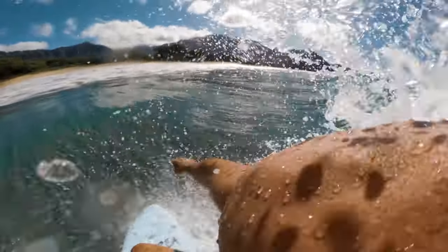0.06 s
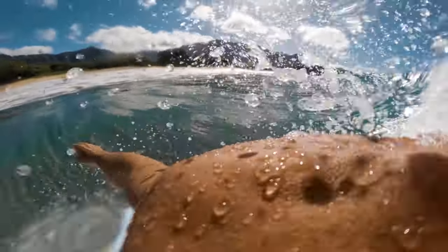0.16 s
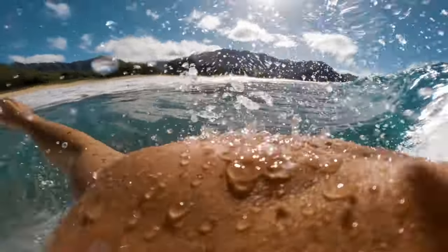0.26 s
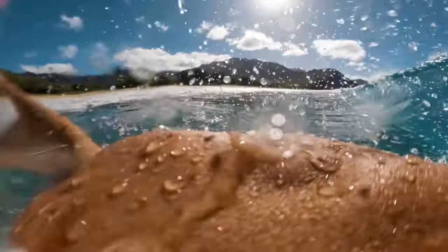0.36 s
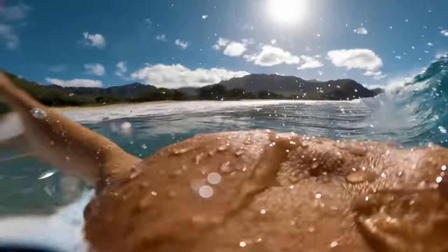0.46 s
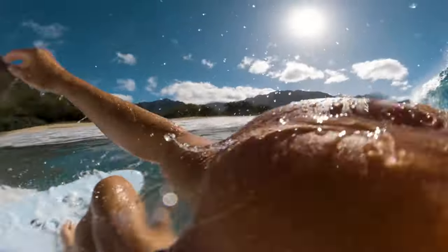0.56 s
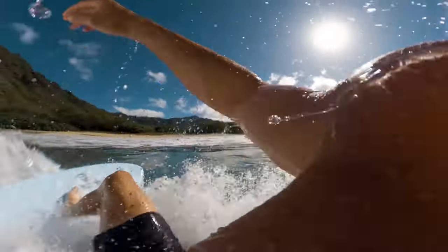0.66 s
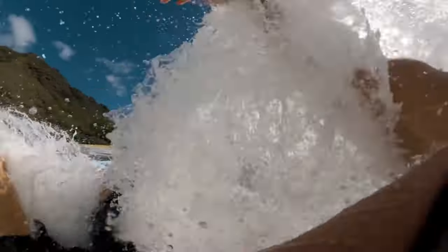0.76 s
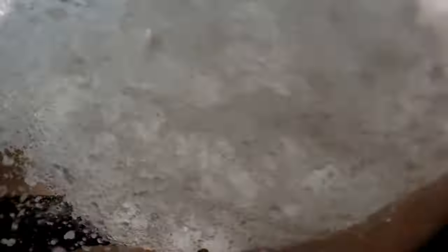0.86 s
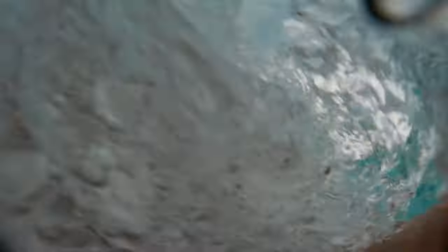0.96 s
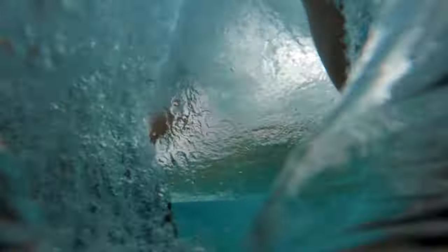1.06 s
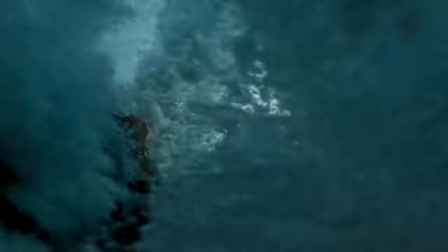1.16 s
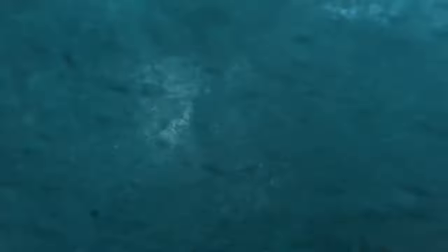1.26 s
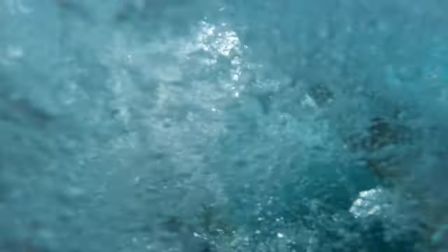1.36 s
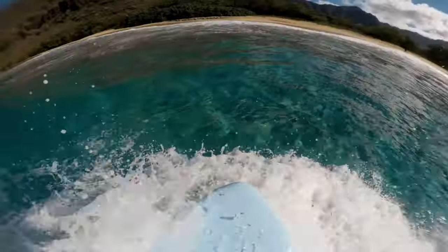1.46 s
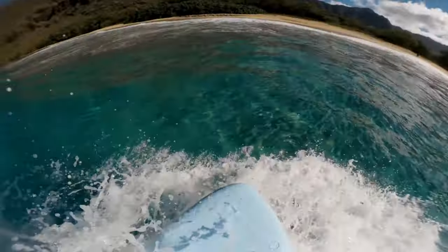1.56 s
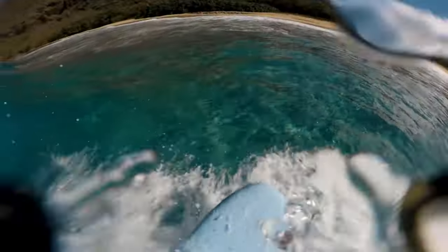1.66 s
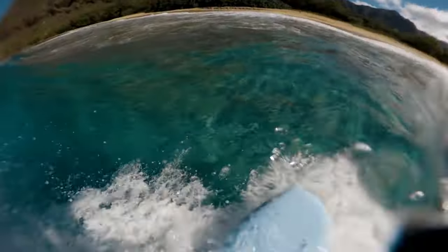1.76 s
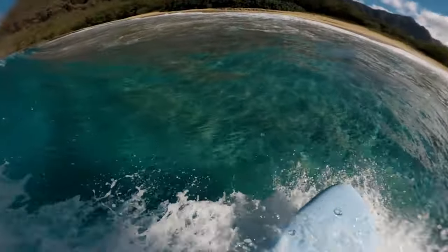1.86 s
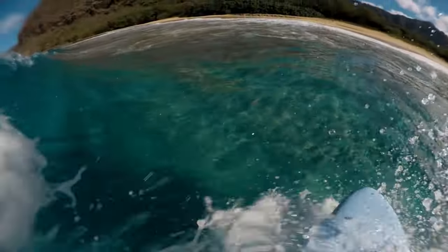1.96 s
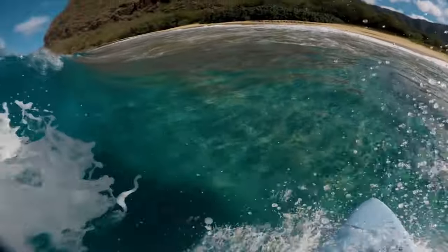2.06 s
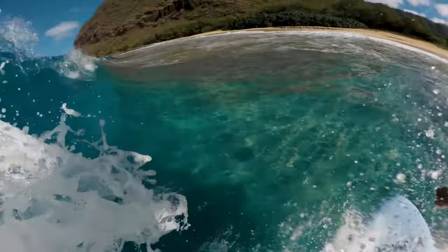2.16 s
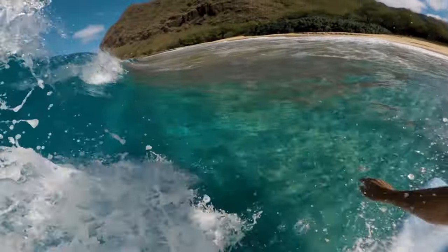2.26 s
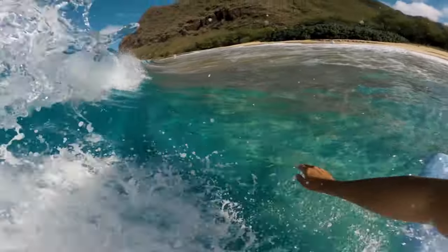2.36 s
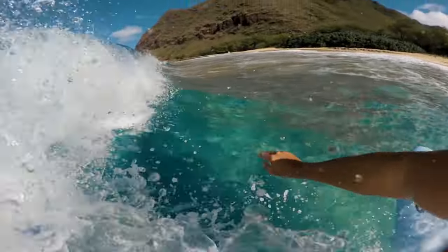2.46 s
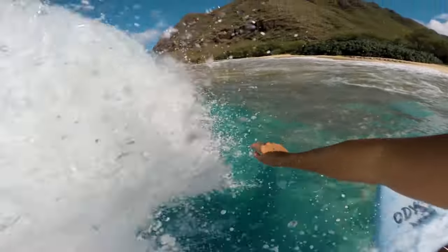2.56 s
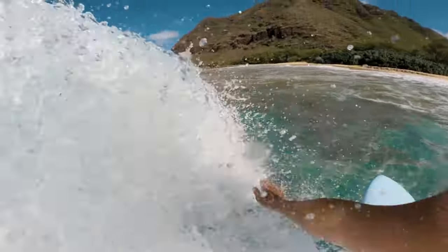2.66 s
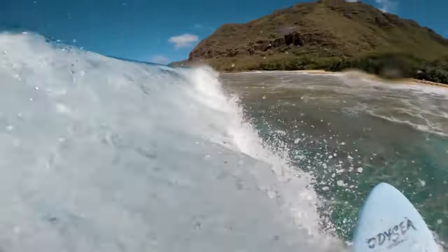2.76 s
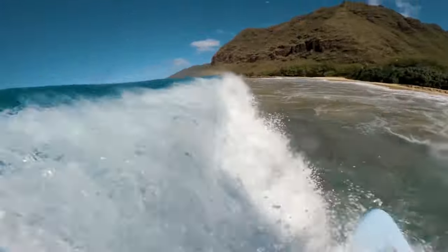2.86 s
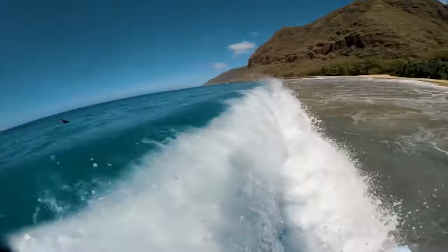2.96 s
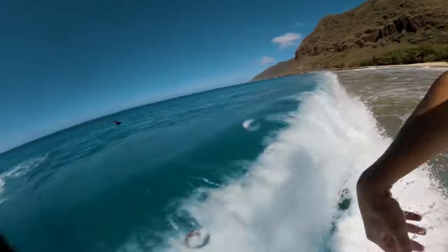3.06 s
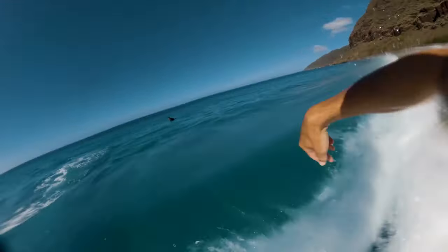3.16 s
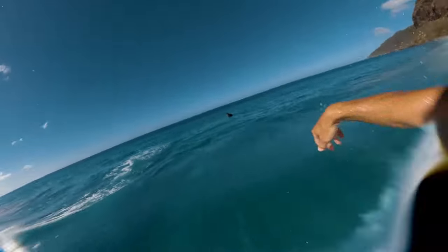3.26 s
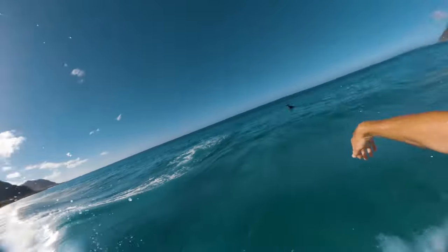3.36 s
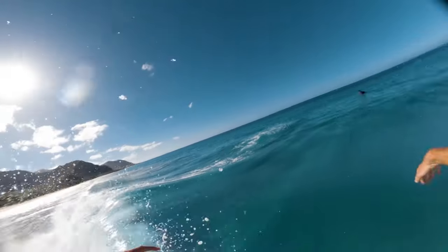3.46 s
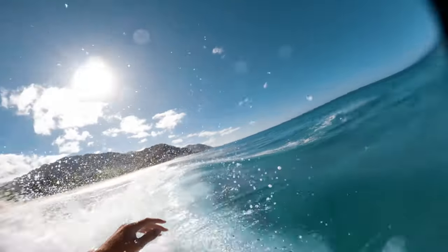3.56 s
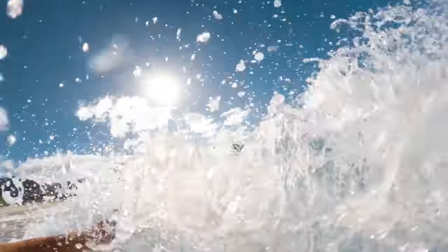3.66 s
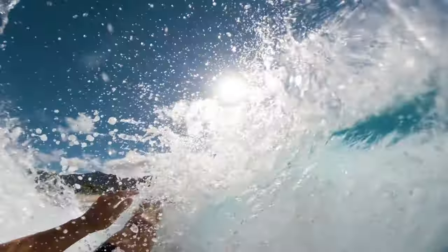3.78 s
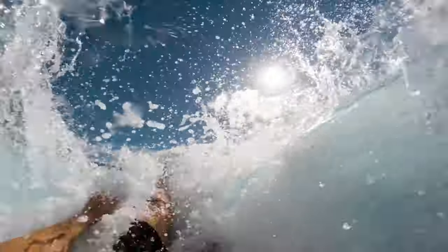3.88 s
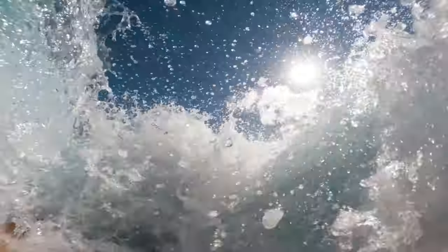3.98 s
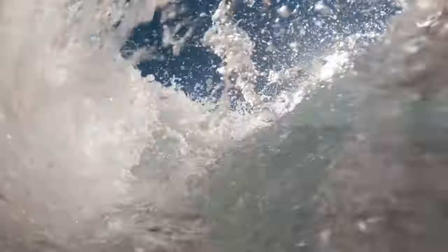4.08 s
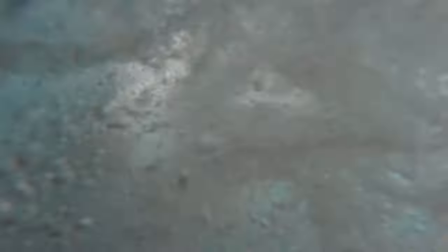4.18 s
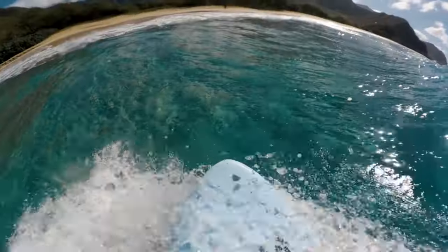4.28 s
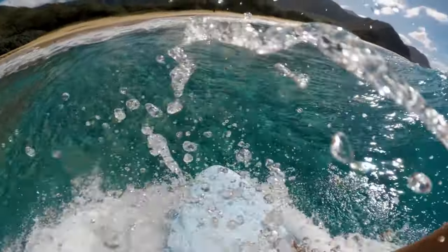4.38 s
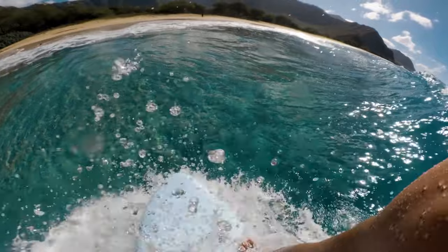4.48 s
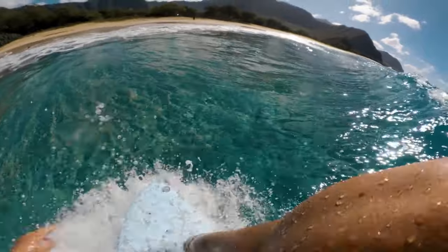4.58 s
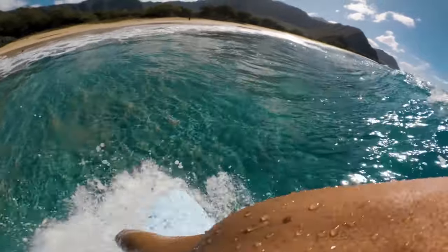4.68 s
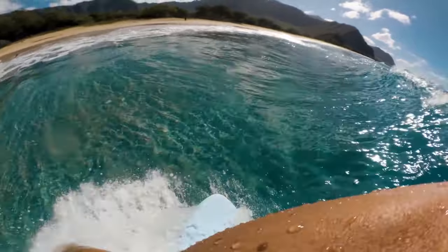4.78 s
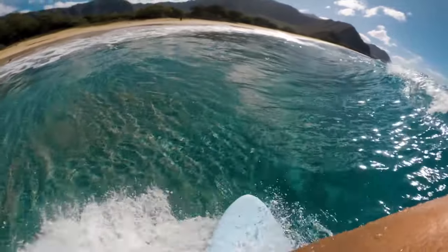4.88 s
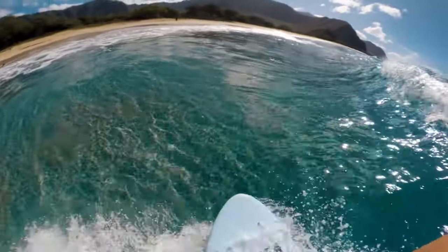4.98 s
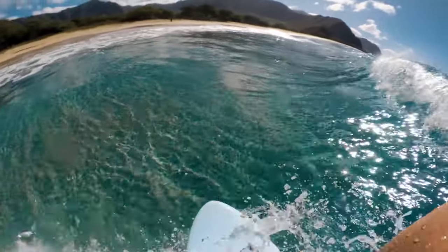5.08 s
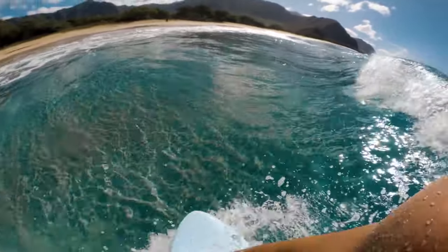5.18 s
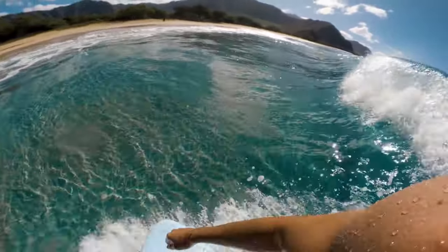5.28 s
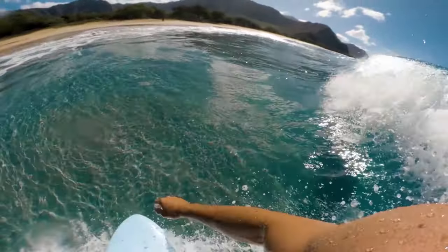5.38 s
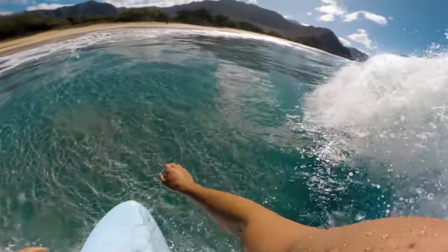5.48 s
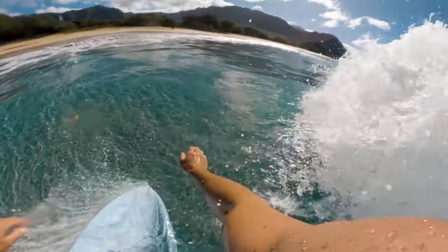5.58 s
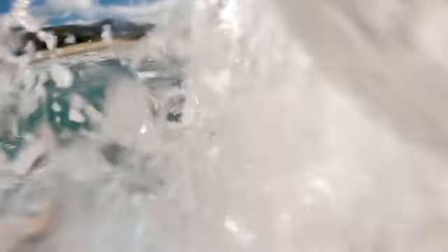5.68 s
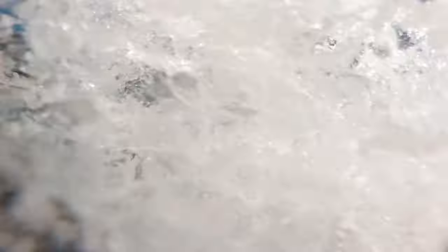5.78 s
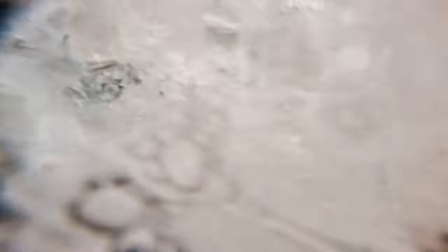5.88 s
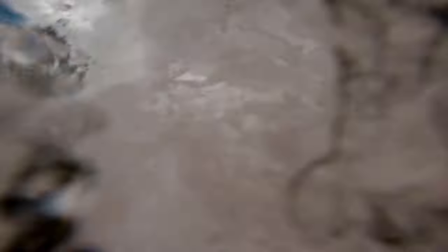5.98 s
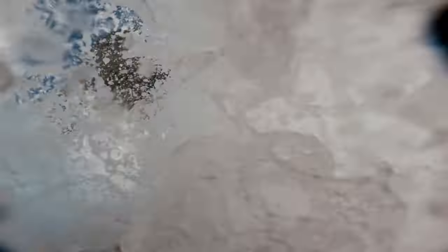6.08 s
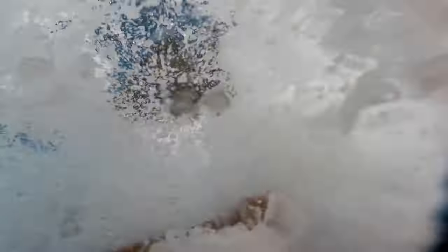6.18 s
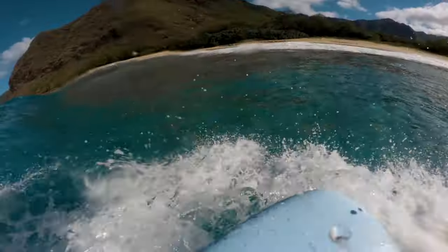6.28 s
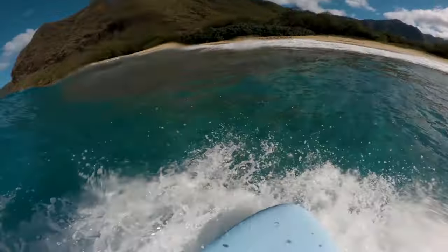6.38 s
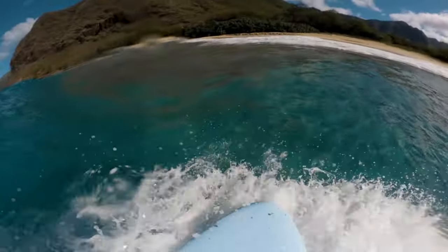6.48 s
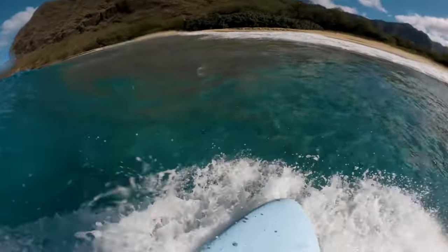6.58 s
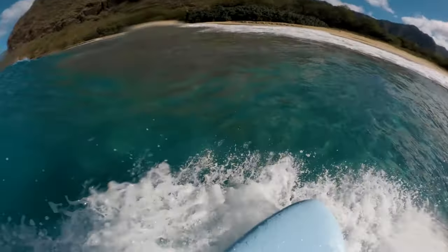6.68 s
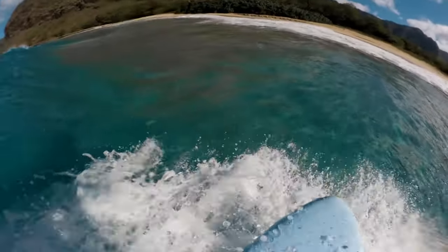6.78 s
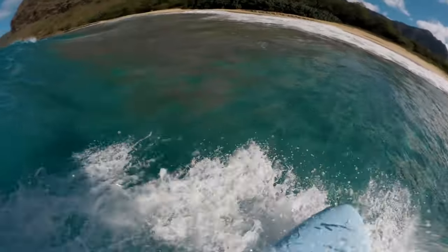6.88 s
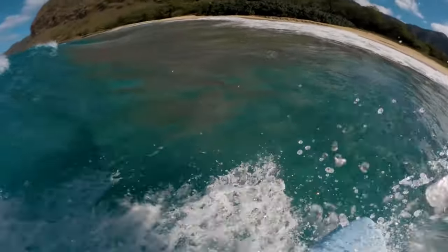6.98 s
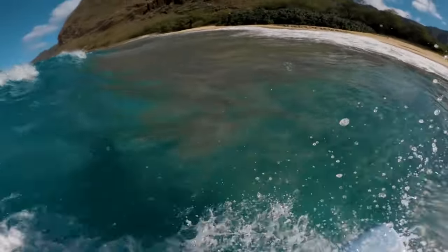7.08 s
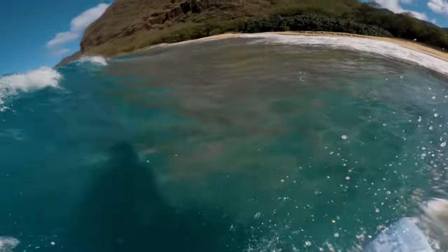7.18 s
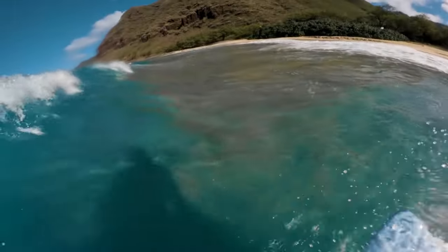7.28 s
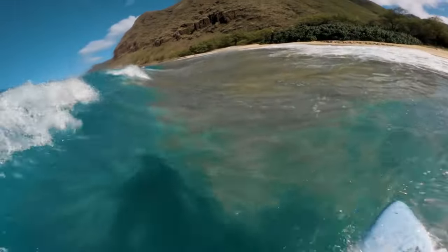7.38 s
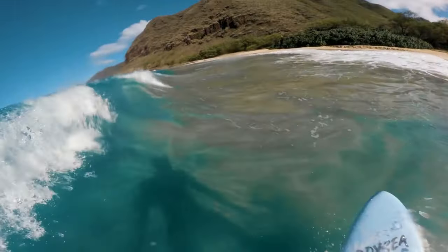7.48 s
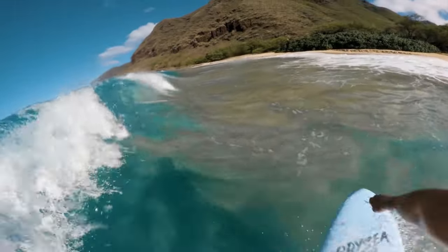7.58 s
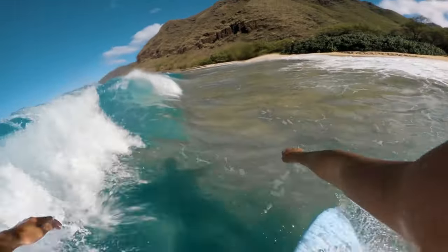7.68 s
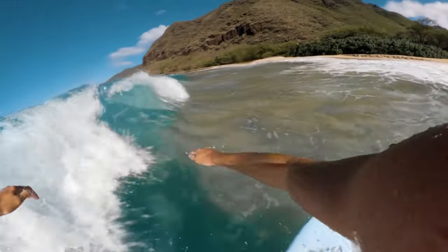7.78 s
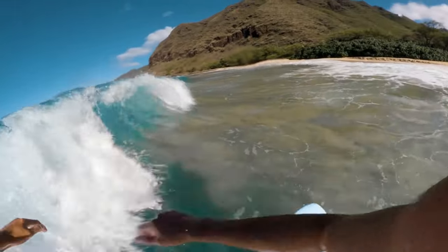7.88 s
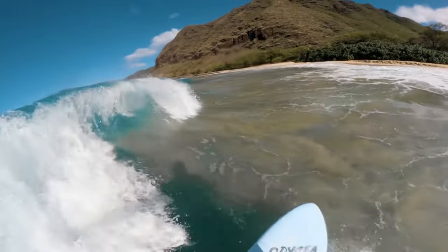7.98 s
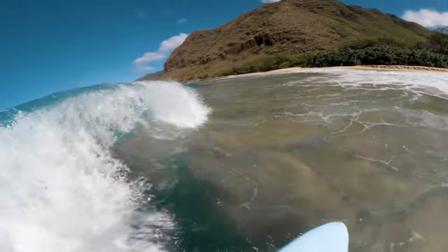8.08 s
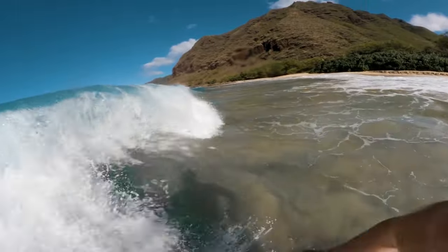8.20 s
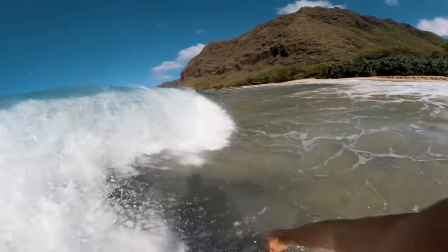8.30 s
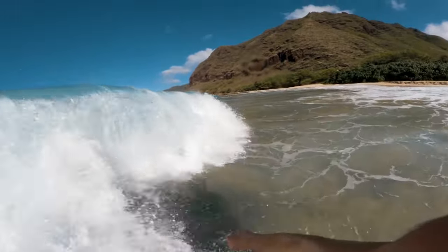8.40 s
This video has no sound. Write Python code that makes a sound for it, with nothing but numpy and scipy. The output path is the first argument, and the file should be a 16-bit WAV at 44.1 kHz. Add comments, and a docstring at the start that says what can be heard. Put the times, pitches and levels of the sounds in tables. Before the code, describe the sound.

A surfer rides a breaking sea wave, with deep churning, bubbling froth and low wind rumble right at the microphone. Water slaps and sputters against the camera housing early on. Later come glugs and a splash, followed by a wavering, watery whistle with wind thumps. Foam then hits the housing again in a loud cluster of muffled slaps, and fine spray hisses over the churning water toward the end.

```python
"""Whitewater churns round a surfboard, heard from the rider's small camera; wind buffets the microphone.
Entrained air rings as bubbles, air pockets glug, drops shower down. Twice foam swamps the camera,
sputtering and slapping on the housing. After one splash a water film covers the port and rings in
gliding resonances as the air stream pulls at it. Near the end spray hisses across the port."""
import sys
import numpy as np
from scipy import signal
from scipy.fft import rfft, irfft, next_fast_len
from scipy.io import wavfile
from scipy.ndimage import map_coordinates

SR = 44100
rng = np.random.default_rng(int(sys.argv[2]) if len(sys.argv) > 2 else 0)


def to_wav(s):
    """Save 16-bit WAV."""
    ch = np.atleast_2d(s).T  # columns
    pcm = np.round(np.clip(ch, -1, 1) * 32767)  # PCM
    wavfile.write(sys.argv[1], SR, pcm.astype(np.int16))


N = 372204

# water film resonances: (ratio to lowest [-], relative width [-], level [dB])
FILM_MODES = [(1, .06, 1), (1.51, .055, 1.5), (2.3, .06, 3), (3.05, .08, -4)]
# wet port transmission: (frequency [Hz], gain [dB])
WET_PORT = [(600, -74), (1100, -4), (1600, -1.5), (2300, -6), (3100, 0), (4300, -2.5), (5800, -7.5),
            (7000, -18.5), (9000, -27), (10300, -28), (13000, -39), (15500, -58)]


def amp(db):
    """Decibels to gain."""
    return 10 ** (np.asarray(db) / 20)


def unit(x):
    """x at rms 1."""
    return x / np.sqrt(np.mean(x ** 2) + 1e-20)


def along(points, hz):
    """Interpolate (Hz, value) points on a log axis."""
    f, v = np.transpose(points)
    return np.interp(np.log(hz + 1), np.log(f + 1), v)


def curve(rows):
    """Interpolate (s, value) rows per sample."""
    return np.interp(np.arange(N) / SR, *np.transpose(rows))


def ramp(start_s, end_s, first, last):
    """Linear from first to last, held outside."""
    return curve([(start_s, first), (end_s, last)])


def gate(start_s, end_s, rise_s, fall_s):
    """Gain that opens from start_s and closes from end_s."""
    t = np.arange(N) / SR
    return np.clip((t - start_s) / rise_s, 0, 1) * np.clip(1 - (t - end_s) / fall_s, 0, 1)


def wobble(rate_hz):
    """Smooth random curve, rate_hz knots a second."""
    knots = rng.standard_normal(int(N * rate_hz / SR) + 4)
    return map_coordinates(knots, [np.arange(N) * rate_hz / SR])


def filtered(x, response):
    """Apply a gain given as a function of Hz."""
    m = next_fast_len(N + SR // 2)
    return irfft(rfft(x, m) * response(np.fft.rfftfreq(m, 1 / SR)), m)[:N]


def shaped(x, spectrum):
    """Filter by (Hz, dB) points."""
    return filtered(x, lambda hz: amp(along(spectrum, hz)))


def rush(spectrum, lump_db, lump_hz):
    """Turbulent noise in short random lumps; rms 1."""
    eddies = rng.standard_normal(N) * amp(lump_db * wobble(lump_hz))
    return unit(shaped(eddies, spectrum))


def narrow_note(hz, width_hz):
    """Resonance rung by turbulence: a wavering note that follows hz; rms 1."""
    phase = 2 * np.pi * np.cumsum(hz) / SR
    return unit(wobble(width_hz) * np.cos(phase) + wobble(width_hz) * np.sin(phase))


def surges():
    """Water masses roll over the camera: gains of roar, wash and thud."""
    # (start [s], end [s], roar [dB], wash [dB], thud [dB])
    masses = [(0.806, 0.895, -20.5, -20, -20.5), (0.905, 1.097, -22, -23.5, -21.5),
              (1.095, 1.178, -18.5, -20, -19.5), (1.179, 1.247, -16, -24.5, -17.5),
              (1.259, 1.292, -13, -16.5, -16.5), (1.365, 1.469, -17.5, -36, -20.5),
              (1.504, 1.565, -39, -47, -36), (1.915, 1.965, -36, -40, -23), (1.985, 2.085, -50, -42, -29),
              (3.687, 3.763, -25, -27, -25), (4.001, 4.173, -21, -26, -30), (4.154, 4.298, -15.5, -19, -18),
              (5.776, 5.824, -23, -41, -21.5), (5.855, 5.89, -21.5, -40, -20.5),
              (5.9, 5.984, -17, -24.5, -16.5), (5.989, 6.17, -19.5, -24, -20.5),
              (6.974, 7.056, -23.5, -39, -27.5)]
    return sum(amp(levels_db)[:, None] * gate(start_s, end_s, .02, .004)
               for start_s, end_s, *levels_db in masses)


def wind(thud):
    """Air stream buffets the microphone; surges add thuds in the same band."""
    # air stream: (time [s], level [dB])
    levels = [(1.15, -26.5), (1.255, -34), (1.31, -26), (1.45, -27.5), (1.75, -43.5), (2.05, -35.5),
              (2.27, -41.5), (2.5, -29.5), (3.2, -21), (4.05, -26), (4.65, -43.5), (5.05, -24.5),
              (5.4, -34.5), (5.75, -19), (6.3, -26), (6.5, -29), (7.2, -38.5), (7.85, -24), (8.44, -22.5)]
    # buffeting: (frequency [Hz], density [dB])
    spectrum = [(10, -33.5), (18, -11), (28, 2.5), (45, -1), (90, -3), (130, -4), (170, -7.5), (240, -45),
                (500, -100)]
    return np.hypot(amp(curve(levels)), thud) * amp(2) * rush(spectrum, lump_db=1.9, lump_hz=25)


def churn(flow_db, roar):
    """Deep turbulence under the board."""
    # (frequency [Hz], density [dB])
    spectrum = [(50, -44.5), (110, -16), (145, -1), (240, 0.5), (400, -3), (520, -10), (800, -46),
                (1500, -100)]
    gain = np.hypot(amp(flow_db + .8 * wobble(11)), roar) * amp(-.4)
    return gain * rush(spectrum, lump_db=2, lump_hz=90)


def bubbles(centre_hz, spread, decay_cycles, size_db, count):
    """Bubble cloud, each a damped note rising in pitch; rms 1."""
    when, pitch, size = rng.random(count), rng.standard_normal(count), rng.exponential(size=count)
    hz = centre_hz * np.exp(spread * np.clip(pitch, -2, 2))[:, None]
    cycles = hz * np.arange(SR // 40) / SR
    age = cycles / decay_cycles
    notes = np.sin(2 * np.pi * cycles * (1 + age / 20)) * np.exp(-age) * (1 - np.exp(-cycles))
    notes *= amp(size_db * np.minimum(size, 4))[:, None]
    index = (when * N).astype(int)[:, None] + np.arange(SR // 40)
    return unit(np.bincount(index.ravel(), notes.ravel(), N)[:N])


def wash(excess_flow_db, splash):
    """Froth in which entrained air rings as thousands of bubbles."""
    # (frequency [Hz], density [dB])
    spectrum = [(200, -31.5), (380, -9), (500, -2.5), (700, -2), (840, -5), (980, -11.5), (1300, -47),
                (2500, -100)]
    cloud = bubbles(centre_hz=650, spread=.3, decay_cycles=4.5, size_db=2.2, count=3600)
    cloud = unit(shaped(cloud, spectrum))
    froth = rush(spectrum, lump_db=1.2, lump_hz=110)
    return np.hypot(amp(-24 + .55 * excess_flow_db), splash) * unit(froth + amp(-1.5) * cloud)


def foam(excess_flow_db, splash):
    """Foam rushes on top of the wash, growing with flow and surges."""
    # at mid flow: (time [s], level [dB])
    levels = [(1.12, -31), (1.25, -37), (1.32, -27), (1.44, -38), (1.55, -35), (2.2, -36.5), (2.36, -26.5),
              (3.2, -34), (3.7, -29), (4.15, -31.5), (4.7, -34.5), (5.6, -48), (6.0, -38), (6.9, -36.5),
              (7.25, -46.5), (8.44, -44)]
    # (frequency [Hz], density [dB])
    spectrum = [(500, -48.5), (800, 0), (1000, 0.5), (1300, -8), (1650, -16), (2200, -26), (3200, -39.5),
                (4200, -47), (6500, -61.5), (9000, -85.5), (12000, -115)]
    level_db = curve(levels) + .28 * excess_flow_db + 2.1 * wobble(12)
    gain = np.hypot(amp(level_db), amp(-16) * splash) * amp(3.5)
    return gain * rush(spectrum, lump_db=2, lump_hz=130)


def whitewater():
    """Wind plus the churn, wash and foam that the flow drives."""
    # flow round the board: (time [s], level [dB])
    flow = [(1.15, -23.5), (1.255, -34.5), (1.31, -23.5), (1.42, -24.5), (1.51, -40), (1.62, -35),
            (1.8, -28), (2.17, -31), (2.33, -27), (2.48, -19), (2.9, -20), (3.22, -19), (3.38, -25),
            (3.85, -22.5), (4.38, -23.5), (4.56, -25), (5.3, -26.5), (5.65, -24.5), (5.84, -31),
            (5.97, -25), (6.22, -27), (6.4, -20), (7.02, -22), (7.32, -24.5), (8.15, -18.5), (8.44, -20)]
    flow_db, mid_flow_db = curve(flow), -22
    excess_db = flow_db - mid_flow_db
    roar, splash, thud = surges()
    return wind(thud) + churn(flow_db, roar) + wash(excess_db, splash) + foam(excess_db, splash)


def edged(roar):
    """At times the roar is full up to a sharp edge and dark just above it."""
    # (start [s], end [s], edge [Hz], lift below [dB], cut above [dB])
    edges = [(0.78, 1.08, 746, 2, -5), (4.45, 4.935, 940, 2.5, -4), (4.97, 5.734, 892, 5.5, -4),
             (7.35, 8.44, 790, 0, -2.5)]
    out = roar.copy()
    for start_s, end_s, hz, lift_db, cut_db in edges:
        shape = [(.75 * hz, 0), (.98 * hz, lift_db), (1.05 * hz, cut_db),
                 (1.6 * hz, cut_db), (3 * hz, 0)]
        out += gate(start_s, end_s, .034, .034) * (shaped(roar, shape) - roar)
    return out


def glugs():
    """Big air pockets glug on the housing: short, wavering, slightly rising notes."""
    # (time [s], pitch [Hz], peak [dB], length [s])
    pockets = [(0.845, 482, -17, .022), (0.868, 510, -14, 0.023), (0.895, 310, -19, 0.023),
               (1.192, 395, -15, 0.018), (1.38, 503, -15.5, 0.026), (1.425, 519, -20.5, 0.028),
               (3.725, 1050, -21, .012), (3.738, 620, -19, 0.015), (3.787, 240, -14, .016),
               (3.818, 237, -12, 0.017), (3.85, 321, -9.5, 0.015), (3.884, 854, -21, 0.014),
               (3.916, 290, -15, 0.026), (3.937, 934, -20, 0.01), (3.96, 139, -13, 0.048),
               (4.06, 160, -18, 0.05), (4.097, 790, -17, .012), (4.112, 310, -12.5, 0.02),
               (4.135, 960, -16, .012), (4.24, 513, -14, 0.033)]
    rise_per_length = .098
    out, t = np.zeros(N + SR), np.arange(SR // 6) / SR
    for start_s, hz, db, length_s in pockets:
        age = t / length_s
        glide_hz = hz * (1 + rise_per_length * (age - .5))
        phase = 2 * np.pi * np.cumsum(glide_hz) / SR + .52 * wobble(150)[:len(t)]
        envelope = 2 * age * np.exp(.5 - 2 * age ** 2)
        out[round(start_s * SR):][:len(t)] += amp(db) * envelope * np.sin(phase)
    return out[:N]


def drops():
    """Showers thrown up by the board, over constant faint spray."""
    # (start [s], end [s], from [dB], to [dB])
    showers = [(1.06, 1.237, -63, -57), (1.265, 1.422, -57, -61), (1.483, 1.58, -55, -55),
               (1.6, 1.987, -61, -61), (2.484, 2.52, -55, -50.5), (2.56, 2.846, -53, -62.5),
               (3.07, 3.12, -59, -68), (3.598, 3.735, -54.5, -59), (3.785, 3.82, -56, -61),
               (3.895, 4.02, -52, -55), (4.04, 4.297, -57, -55), (6.278, 6.952, -61.5, -58),
               (6.966, 7.008, -44.5, -44.5), (7.133, 7.135, -32, -36.5)]
    # (frequency [Hz], density [dB])
    spectrum = [(700, -31), (1600, -2), (2600, 5), (3700, -2), (4500, -9), (6000, -16.5), (8000, -30.5),
                (12000, -61)]
    far_spray_db = -68.5
    gain = sum(gate(start_s, end_s, .017, .027) * amp(ramp(start_s, end_s, from_db, to_db))
               for start_s, end_s, from_db, to_db in showers)
    return (amp(far_spray_db) + gain) * rush(spectrum, lump_db=1.9, lump_hz=260)


def slap(length_s, tilt_db_per_octave):
    """One lump of water: a short splash and the bubble it traps."""
    t, lead = np.arange(SR // 10) / SR, SR // 100
    burst = np.exp(-(t / length_s) ** 4) * (1 - np.exp(-t / .00088)) * rng.standard_normal(len(t))
    bubble_hz, decay_s, pivot_hz = 1404 * rng.uniform(.7, 1.3), .0033, 2000
    bubble = amp(-11) * np.exp(-t / decay_s) * np.sin(2 * np.pi * bubble_hz * t)
    sound = np.pad(burst + bubble, lead)
    octaves = np.log2(np.clip(np.fft.rfftfreq(len(sound), 1 / SR) / pivot_hz, .5, 2))
    return irfft(rfft(sound) * amp(tilt_db_per_octave * octaves), len(sound))[lead:]


def sputter():
    """Foam on the housing: bursts of rapidly flickering noise."""
    # (start [s], length [s], initial level [dB], fall [dB])
    bursts = [(1.132, .076, -39.5, -0.5), (1.196, .04, -53, 11), (1.262, .16, -40, 8.5),
              (4.196, .1, -38.5, 8.5), (4.369, .17, -45, 0), (5.79, .115, -32.5, 2), (5.904, .06, -31.5, 6),
              (5.985, .03, -46, 2), (6.011, .07, -36, 1), (6.098, .08, -39, 17)]
    gain = sum(gate(s, s + length_s, .011, .0061) * amp(ramp(s, s + length_s, db, db - fall_db))
               for s, length_s, db, fall_db in bursts)
    return gain * amp(4) * unit(rng.standard_normal(N) * amp(4.8 * wobble(260)))


def swamping():
    """Slaps and sputter, dulled by the housing."""
    # lumps of water: (time [s], level [dB], length [s], tilt [dB/octave])
    lumps = [(1.109, -33, .009, -1), (1.133, -21, .008, 1.5), (1.162, -27.5, .005, 2),
             (1.171, -17, .007, 4.5), (1.182, -22.5, .006, 2), (1.191, -16.5, .005, 5.5),
             (1.2, -22.5, .007, 1), (1.248, -36, .003, 0), (1.281, -27.5, .006, -1),
             (1.371, -28.5, .0039, -2), (1.4, -32.5, .005, 0), (1.424, -36, .003, -0.5),
             (1.459, -31.5, .002, 0), (1.464, -31, .0022, 0), (1.958, -41, .012, -1),
             (2.544, -28, .0041, 1), (4.003, -35, .008, -0.5), (4.219, -27, .018, -1.5),
             (4.258, -25.5, .004, -2), (4.284, -31.5, .003, -1), (4.431, -27.5, .012, 0),
             (5.786, -17.5, .003, -0.5), (5.809, -10.5, .003, -2), (5.849, -19.5, .003, 1.5),
             (5.871, -19, .004, -2.5), (5.877, -14, .0035, 0), (5.912, -18, .005, -1),
             (5.918, -16, .004, 0), (5.923, -12.5, .006, -0.5), (5.933, -16, .0045, -1),
             (5.941, -15.5, .007, 0), (5.952, -19.5, .005, 0.5), (5.958, -22.5, .006, 0),
             (5.971, -16, .0055, 0), (5.99, -27, .006, -1), (6.023, -19.5, .008, 0), (6.031, -20, .009, 0),
             (6.041, -19, .006, 0), (6.051, -20, .009, 0), (6.062, -21.5, .006, 1.5),
             (6.074, -18, .009, 0.5), (6.105, -23, .004, -1), (6.111, -26, .0076, -2.5),
             (6.123, -24.5, .005, -2.5), (6.135, -31, .005, -2), (6.145, -33, .0043, -2),
             (6.187, -36, .0022, 1), (6.242, -36, .004, -2.5), (6.255, -28, .004, 0)]
    # housing response: (frequency [Hz], gain [dB])
    housing = [(60, -19), (150, 7), (350, -7), (600, -8), (1200, 5.5), (2000, -3), (3300, -9.5),
               (4500, -21.5), (6000, -32.5), (8500, -46), (12000, -71.5), (15000, -101.5)]
    out = np.pad(sputter(), (0, SR))
    for start_s, db, length_s, tilt in lumps:
        sound = amp(db - 3.5) * slap(length_s, tilt)
        out[round(start_s * SR):][:len(sound)] += sound
    return amp(12) * shaped(out[:N], housing)


def gurgles():
    """Water drains off the port or sloshes by the board: gliding, pulsing resonances."""
    # (start [s], end [s], from [Hz], to [Hz], width [Hz], from [dB], to [dB], pulsing [dB])
    glides = [(1.17, 1.185, 3000, 2900, 1600, -35, -36, 2), (1.275, 1.36, 1450, 1250, 700, -30, -32, 3),
              (1.479, 1.585, 2950, 3280, 650, -47, -57, 1.5),
              (1.758, 2.045, 1000, 822, 380, -30, -30.5, .5),
              (3.716, 3.756, 1010, 882, 399.6, -16.5, -23.5, 2.5),
              (3.984, 4.011, 1050, 1500, 350.6, -29, -28.5, 2),
              (3.98, 4.2, 1150, 1044, 500, -38, -25.5, 4.5), (4.37, 4.385, 3950, 3850, 500, -36.5, -36, 2),
              (4.408, 4.44, 1600, 1950, 600, -35, -34, 4), (4.465, 4.51, 2250, 2050, 601, -40, -40, 2),
              (5.785, 5.85, 1850, 1480, 340, -25, -27, 1), (5.872, 5.915, 1620, 1250, 420, -19.5, -20.5, 1),
              (7.129, 7.134, 3510, 3590, 900, -31, -32, 1)]
    out = np.zeros(N)
    for start_s, end_s, from_hz, to_hz, width_hz, from_db, to_db, pulsing_db in glides:
        note = narrow_note(ramp(start_s, end_s, from_hz, to_hz), width_hz)
        level_db = ramp(start_s, end_s, from_db, to_db) + pulsing_db * wobble(140)
        out += note * gate(start_s, end_s, .003, .024) * amp(level_db)
    return out


def ticks():
    """Sharp dry clicks with a brief fizz, probably the camera switching microphones."""
    # (time [s], level [dB])
    clicks = [(1.476, -44), (4.2956, -32.5), (6.3134, -30)]
    decay_s, fizz_s = .0003, .0015
    out, t = np.zeros(N + SR), np.arange(SR // 100) / SR
    pulse = np.exp(-t / decay_s)
    for start_s, db in clicks:
        burst = rng.standard_normal(len(t)) * np.exp(-t / fizz_s)
        fizz = np.convolve(burst, pulse / np.linalg.norm(pulse))[:len(t)]
        out[round(start_s * SR):][:len(t)] += amp(db + 13.5) * (pulse + amp(-18) * fizz)
    return out[:N]


def film_pitch_hz(t):
    """Lowest film resonance: sinks as water gathers, climbs as it drains."""
    # runs of water: (thickest at [s], lowest pitch [Hz], gathering [s], draining [s])
    runs = [(4.35, 1550, .07, .1), (4.42, 1450, .095, .14), (4.505, 1620, .085, .065),
            (4.58, 1850, .058, .072), (4.785, 1850, .04, .135), (5.125, 1540, .068, .075),
            (5.248, 1850, .05, .052), (5.335, 2800, .05, .06), (5.398, 2170, .034, .046),
            (5.497, 2300, .042, .046), (5.628, 1680, .052, .122), (5.8, 1900, .1, .15)]
    thin_hz, dips_hz = 3900, []
    for s, hz, gather_s, drain_s in runs:
        gap_s = np.abs(t - s)
        distance = np.where(t < s, (gap_s / gather_s) ** 2.57, (gap_s / drain_s) ** 1.82)
        dips_hz.append((thin_hz - hz) * np.exp(-distance))
    return thin_hz - np.max(dips_hz, axis=0)


def film_ring():
    """Air rings the film; all resonances glide up together as it thins; rms 1."""
    def ripple(rate_hz):
        return np.interp(t * SR, np.arange(N), wobble(rate_hz))

    cavity_hz, cavity_width_hz, cavity_db = 3120, 240, 4.5
    hz, t, noise = signal.stft(rng.standard_normal(N), SR, nperseg=512, noverlap=448)
    hz = hz[:, None]
    pitch_hz = film_pitch_hz(t)
    damping = 1 + (pitch_hz / 3300) ** 16  # a thin film dissolves into hiss
    response = 0
    for ratio, width, db in FILM_MODES:
        # ripples detune each mode and make it come and go
        mode_hz = ratio * pitch_hz * (1 + .018 * ripple(130) + .01 * ripple(35))
        strength = amp(db + 2.8 * ripple(60)) / (1 + (mode_hz / 4600) ** 6)
        # a mode flares as it crosses the port's cavity resonance
        strength *= amp(cavity_db / (1 + ((mode_hz - cavity_hz) / cavity_width_hz) ** 2))
        strength /= (1 + (pitch_hz / 2800) ** 10) ** (ratio - 1)  # upper modes fade first
        loss = 1j * hz / mode_hz * width * damping
        response = response + strength * loss / (1 - (hz / mode_hz) ** 2 + loss)
    gain = np.hypot(np.abs(response), amp(-16.5) * damping) * amp(along(WET_PORT, hz))
    # a thick film shuts out the highest hiss
    thickness = np.interp(pitch_hz, [1650, 2750], [1, 0])
    gain *= amp(-19 * thickness * np.interp(hz, [5500, 8500], [0, 1]))
    gain /= np.mean(gain ** 2, axis=0) ** .5
    return unit(signal.istft(noise * gain, SR, nperseg=512, noverlap=448)[1][:N])


def film_whistle():
    """The three lowest resonances whistle in spurts while the film is thick."""
    pitch_hz = film_pitch_hz(np.arange(N) / SR)
    notes = np.zeros(N)
    for ratio, _, _ in FILM_MODES[:3]:
        hz = ratio * pitch_hz * (1 + .015 * wobble(80))
        strength = amp(along(WET_PORT, hz) + 2.2 * wobble(70)) / (1 + (hz / 4900) ** 8)
        notes += strength * narrow_note(hz, width_hz=420)
    return amp(-10) * notes / (1 + (pitch_hz / 3100) ** 16)


def water_film():
    """The film on the port rings, breaks into gushes and spatter, and thumps as wind pumps it."""
    # ringing: (time [s], level [dB])
    ring_levels = [(4.31, -44), (4.446, -37.5), (4.456, -42.5), (4.522, -33), (4.71, -31), (4.794, -25),
                   (4.874, -27.5), (4.924, -24.5), (4.974, -28), (5.098, -24.5), (5.124, -30.5),
                   (5.178, -21.5), (5.186, -25.5), (5.274, -19.5), (5.282, -23), (5.73, -20), (5.742, -22),
                   (5.754, -16), (5.772, -15), (5.81, -32.5)]
    # pumping: (time [s], level [dB])
    pump_levels = [(4.3, -43), (4.7, -31), (4.765, -20), (4.82, -31), (5.03, -27), (5.08, -20),
                   (5.42, -18.5), (5.68, -24), (5.81, -28)]
    # pumping: (frequency [Hz], density [dB])
    pump_spectrum = [(4, -30), (9, 6), (22, -1), (40, -11), (80, -20), (160, -74), (400, -120)]
    ring = film_ring()
    gush_db, spatter_db = .8 * wobble(50), .9 * wobble(420)
    ringing = unit((ring + film_whistle()) * amp(gush_db + spatter_db)) * amp(curve(ring_levels) - .22)
    pumping = amp(curve(pump_levels)) * rush(pump_spectrum, lump_db=.5, lump_hz=10)
    return (ringing + pumping) * gate(4.3, 5.805, .01, .016)


def top_hiss():
    """A very faint hiss at 12-15 kHz swells and eases near the end."""
    # (time [s], level [dB])
    levels = [(6.6, -88.5), (6.85, -80), (7.1, -78), (7.5, -62.5), (7.85, -72), (8.44, -72)]
    # (frequency [Hz], density [dB])
    spectrum = [(9500, -22), (11500, -5), (12700, 4.5), (14000, 0), (15500, -10)]
    fade_s = .02
    gain = amp(curve(levels)) * gate(levels[0][0] - fade_s, levels[-1][0], fade_s, fade_s)
    return gain * rush(spectrum, lump_db=.5, lump_hz=40)


def spray():
    """Fine spray and air hiss across the port, building and then holding."""
    # (frequency [Hz], density [dB])
    spectrum = [(700, -32.5), (1100, -4.5), (1900, -7.5), (2700, -5.5), (3200, -1), (3600, 1.5),
                (4200, -4.5), (5000, -12), (7000, -20.5), (9000, -35.5), (13000, -48.5), (15500, -63)]
    return amp(-24) * ramp(6.936, 7.806, 0, .98) * rush(spectrum, lump_db=.75, lump_hz=92)


def scene():
    """All sources in mono."""
    water = edged(whitewater()) + glugs() + drops() + swamping() + gurgles()
    return (water + ticks() + water_film() + top_hiss() + spray())[None]


def record(dry):
    """Abrupt start; the camera rounds off peaks and limits the band."""
    start_s, ceiling, top_hz = .843, .95, 15750
    x = dry[0] * ramp(start_s, start_s + .001, 0, 1)
    x = x / (1 + np.abs(x / ceiling) ** 6) ** (1 / 6)
    return filtered(x, lambda hz: hz < top_hz)[None]


dry = scene()
out = record(dry)
to_wav(out)
```